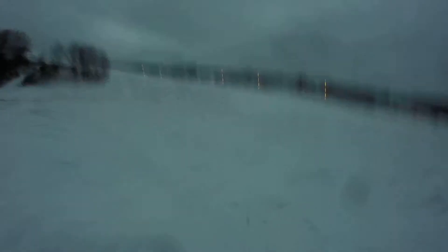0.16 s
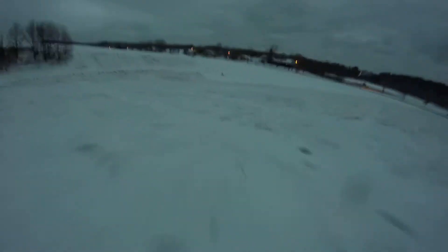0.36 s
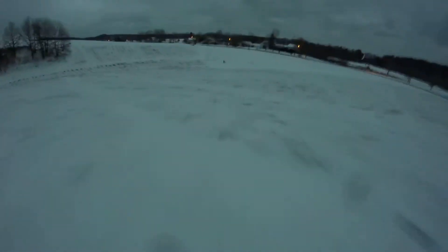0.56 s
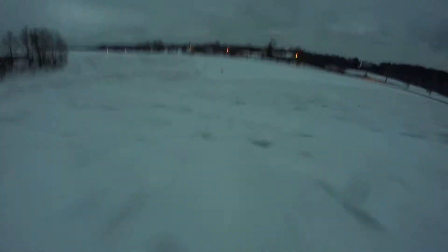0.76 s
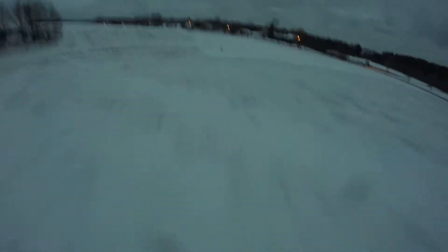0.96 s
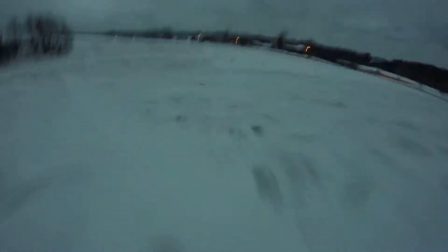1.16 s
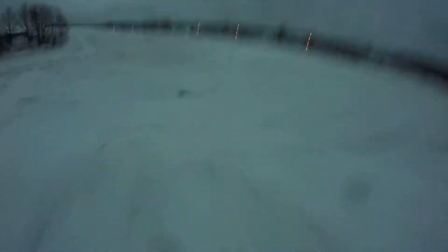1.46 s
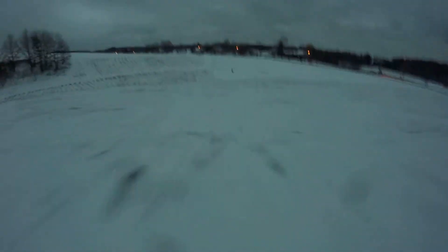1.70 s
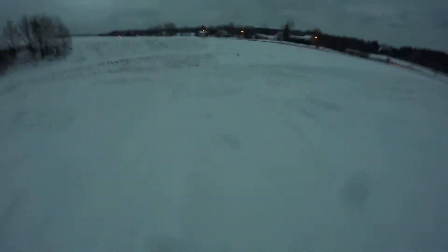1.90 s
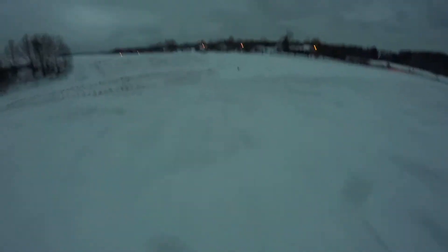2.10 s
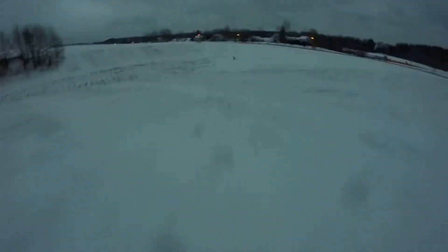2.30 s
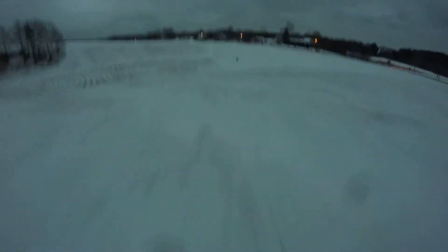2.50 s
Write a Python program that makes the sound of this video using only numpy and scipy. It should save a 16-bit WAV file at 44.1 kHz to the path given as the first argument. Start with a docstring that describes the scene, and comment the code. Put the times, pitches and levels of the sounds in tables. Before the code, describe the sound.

A sled slides fast across a crusty snow field with a continuous, uneven, hollow scrape. Crunches, icy ticks and low thumps break in throughout, while wind rumbles on a small enclosed microphone fixed to the sled.

```python
"""On crusty snow, a fast sled is heard by a small microphone shut in a hard housing fixed to it.
Friction with the grains is a stream of tiny impacts that excites the resonances of hull and housing;
breaking crust and icy lumps excite the same resonances in bursts and ticks. Ridges jolt the springy
mount into damped oscillation and knock the hull, while turbulent air rumbles past the housing."""
import sys
import numpy as np
from scipy import signal
from scipy.fft import rfft, irfft
from scipy.io import wavfile
from scipy.ndimage import uniform_filter1d

SR = 44100
rng = np.random.default_rng(int(sys.argv[2]) if len(sys.argv) > 2 else 0)


def persist_wave(psi):
    """Save psi, clipped to +-1, as 16-bit WAV."""
    counts = np.round(np.clip(psi, -1, 1) * 32767).astype(np.int16)
    wavfile.write(sys.argv[1], SR, np.atleast_2d(counts).T)


N = 116865

# Resonances of hull and housing in three registers, the highest heard as hiss.
# Each row: frequency in Hz, bandwidth of one filter stage in Hz, relative gain in dB.
LOW_MODES = [(1097, 37, -13), (1385, 104, -0.5), (1442, 145, 0), (1522.3, 82, 5), (1666, 156, 1),
             (1805, 122, 2)]
UPPER_MODES = [(2156, 233, -3.5), (2441, 70, -3), (2590, 262, -1), (2850, 270, -5.5), (2960, 270, -10),
               (3475, 640, -15), (3820, 350, -20)]
HISS_MODES = [(4660, 2300, -4), (6126, 1010, 3), (7420, 1050, -2), (8070, 990, -6.5), (9900, 650, -18),
              (11400, 1000, -17.5), (12900, 1200, -21), (13700, 900, -23), (15000, 500, -36)]


def amp(db):
    """Amplitude ratio of a level in decibels."""
    return 10 ** (np.asarray(db) / 20)


def unit_rms(x):
    """Normalisation to an rms of 1."""
    return x / np.sqrt(np.mean(x ** 2) + 1e-20)


def envelopes(rows):
    """Linear interpolation of each column over the times in the first."""
    times, *columns = np.transpose(rows)
    return [np.interp(np.arange(N) / SR, times, column) for column in columns]


def drift(corner_hz):
    """Random modulation: low-passed noise with an rms near 1."""
    step, settle = 20, 2000
    pole = np.exp(-2 * np.pi * corner_hz * step / SR)
    noise = rng.standard_normal(N // step + settle + 2)
    slow = signal.lfilter([1], [1, -2 * pole, pole * pole], noise)[settle:]
    return np.interp(np.arange(N) / step, np.arange(len(slow)), unit_rms(slow))


def coloured(x, spectrum):
    """Spectral shaping by a curve of (Hz, dB) points; rms 1."""
    hz, db = np.transpose(spectrum)
    bin_hz = np.arange(N // 2 + 1) * SR / N + 1
    gain = amp(np.interp(np.log(bin_hz), np.log(hz), db, left=-90, right=-90))
    return unit_rms(irfft(rfft(x) * gain, N))


def impacts(per_s, spread_db):
    """Shot noise: independent impulses of random size and sign; rms 1."""
    sizes = amp(spread_db * np.minimum(rng.exponential(1, N), 5))
    signs = rng.choice([-1, 1], N)
    return unit_rms(sizes * signs * (rng.random(N) < per_s / SR))


def resonate(drives, modes):
    """Modal superposition: two drives feed alternate resonances, each wavering in level; rms 1."""
    total = 0
    for k, (hz, width_hz, db) in enumerate(modes):
        r = np.exp(-np.pi * width_hz / SR)
        stage = [(1 - r * r) / 2, 0, (r * r - 1) / 2, 1, -2 * r * np.cos(2 * np.pi * hz / SR), r * r]
        gain = amp(db + 2 * drift(corner_hz=36.4))
        total = total + gain * signal.sosfilt([stage, stage], drives[k % 2])
    return unit_rms(total)


def scrape():
    """Sliding friction: grain impacts force the hull to ring and drone, louder under greater load."""
    # Load on the snow. Each row: time in seconds, level of the low modes in dB,
    # levels of the upper modes and of the hiss in dB relative to it.
    slide = [(0.0, -39, -6.5, -19), (0.1, -45, -1, -17), (0.13, -29.5, -1.5, -19), (0.15, -37, -2.5, -15.5),
             (0.18, -36, -6.5, -25), (0.22, -38, -2, -15.5), (0.24, -33, -9, -29), (0.29, -29, 0.5, -27),
             (0.29, -23.5, -11, -29), (0.32, -40, -3.5, -24), (0.35, -38, 0, -11), (0.47, -36, -1.5, -21),
             (0.49, -36.5, -5.5, -14.5), (0.52, -38.5, 0.5, -23), (0.54, -31.5, -6.5, -25),
             (0.58, -31, -7, -26), (0.6, -43, 2, -13.5), (0.66, -41, -4.5, -16), (0.69, -41.5, -7, -34),
             (0.71, -31, -8.5, -31), (0.77, -35.5, -3.5, -20), (0.84, -29, -5, -27.5),
             (0.87, -33, 0, -14.5), (0.88, -29.5, -2.5, -23), (0.94, -36.5, -3, -17), (1.0, -37, -4, -15.5),
             (1.03, -42, 0.5, -18), (1.07, -29.5, -3, -21), (1.14, -34, -2.5, -17), (1.2, -30, -6, -22.5),
             (1.26, -32.5, -5, -20.5), (1.31, -38, 2, -13.5), (1.35, -32, -1.5, -28),
             (1.37, -37.5, 0.5, -14), (1.42, -34, -2.5, -18), (1.52, -32.5, -4, -19.5), (1.56, -43, 1, -17),
             (1.62, -35, -3, -20), (1.64, -37.5, 1, -15.5), (1.8, -32.5, -3.5, -19.5), (1.83, -31, -2, -18),
             (1.87, -34, -1.5, -14.5), (1.89, -26.5, -9.5, -23), (1.95, -33.5, -4, -19.5),
             (2.05, -37.5, -7, -23.5), (2.1, -41.5, -2, -19), (2.12, -34.5, 1, -20),
             (2.17, -37.5, -2, -15.5), (2.21, -30.5, -3, -23), (2.235, -34, -4, -20.5),
             (2.28, -28, -8, -23), (2.33, -38.5, -3, -20), (2.365, -30, -7.5, -22.5),
             (2.42, -33, -5.5, -21.5), (2.45, -42.5, 5, -18), (2.48, -30.5, -3.5, -20),
             (2.51, -39.5, -5, -18), (2.53, -33, -10.5, -27), (2.55, -41, 1, -16), (2.57, -31, -7.5, -19.5),
             (2.61, -35, -3.5, -22), (2.65, -30, -2.5, -21)]
    # The hull's dull drone. Each row: frequency in Hz, relative spectral level in dB.
    drone_spectrum = [(76, -48), (130, -3.5), (178, -9.5), (379, -6.5), (445, -13.5), (570, -11),
                      (675, -15.5), (872, -13), (1250, -8), (1620, -19.5), (2750, -120)]
    load_db, upper_db, hiss_db = uniform_filter1d(envelopes(slide), size=int(0.005 * SR))
    chatter = amp(0.59 * drift(corner_hz=44.5))
    grains = [chatter * impacts(per_s=5000, spread_db=2.5) for _ in range(2)]
    low = resonate(grains, LOW_MODES)
    upper = amp(upper_db) * resonate(grains, UPPER_MODES)
    grit = amp(-5.5) * impacts(per_s=150, spread_db=3)
    hiss = amp(hiss_db) * resonate(grains + grit, HISS_MODES)
    drone_db = -43 + 0.78 * (load_db - load_db.mean()) + 1.5 * drift(corner_hz=1.5)
    drone = amp(drone_db) * coloured(grains[0], drone_spectrum)
    return amp(load_db) * (low + upper + hiss) + drone


def wind():
    """Turbulence: fluctuating pressure on the housing gives an uneven rumble over a faint steady hiss."""
    # Gusts. Each row: time in seconds, level in dB.
    gusts = [(0.0, -40), (0.11, -48.5), (0.21, -29), (0.36, -41), (1.04, -45), (1.09, -44), (1.28, -34.5),
             (1.3, -45), (1.47, -31.5), (1.66, -49.5), (1.93, -42.5), (1.96, -39.5), (2.04, -38.5),
             (2.54, -43), (2.65, -46.5)]
    # Spectra of the rumble and the hiss. Each row: frequency in Hz, relative spectral level in dB.
    rumble_spectrum = [(14, 10.5), (25, -1), (45, 3.5), (80, -28), (160, -29), (300, -37.5), (600, -31.5)]
    hiss_spectrum = [(4000, 5), (9000, 3), (12000, -4), (15000, -8), (16000, -14)]
    gust_db, = envelopes(gusts)
    buffeting = amp(gust_db + 3 * drift(corner_hz=9))
    rumble = buffeting * coloured(rng.standard_normal(N), rumble_spectrum)
    return rumble + amp(-71) * coloured(rng.standard_normal(N), hiss_spectrum)


def jolts():
    """Base excitation: ridges push the mount, a damped mass on a spring, and the hull knocks."""
    # Each row: time of the push's peak in seconds, its level in dB, its direction as a sign,
    # its length in seconds, level of the knock in dB.
    ridges = [(0.067, -29, 1, 0.0082, -40.5), (0.244, -14, -1, 0.0063, -33), (0.271, -20, 1, 0.016, -56),
              (0.2818, -4, -1, 0.011, -30.5), (0.2927, -13, 1, 0.0091, -43), (0.306, -18, -1, 0.0079, -41),
              (0.452, -25, -1, 0.0098, -39), (0.666, -25.5, -1, 0.0057, -43),
              (0.733, -25.5, 1, 0.0055, -42), (0.865, -24.5, -1, 0.0088, -39),
              (1.1583, -22, 1, 0.0069, -44), (1.177, -14, -1, 0.024, -33.5), (1.207, -14, -1, 0.0053, -37),
              (1.255, -22.5, 1, 0.013, -51), (1.386, -37, -1, 0.013, -43), (1.4102, -15, -1, 0.005, -35.5),
              (1.449, -18.5, 1, 0.007, -27.5), (1.495, -20.5, -1, 0.02, -65), (1.516, -23, -1, 0.011, -54),
              (1.595, -26, 1, 0.011, -64), (1.796, -16.5, -1, 0.0079, -41), (2.02, -21, -1, 0.015, -44),
              (2.057, -26.5, 1, 0.0061, -42), (2.196, -25, 1, 0.0095, -38.5),
              (2.224, -26.5, 1, 0.0075, -41), (2.305, -21, -1, 0.0067, -39), (2.441, -35.5, 1, 0.01, -44),
              (2.492, -22.5, -1, 0.0068, -50)]
    knock_hz, knock_t60_s = 387, 0.069
    mount_modes = [(66.8, 0.093, 0.5), (49, 0.2, 0.2)]  # frequency in Hz, damping ratio, share
    t, push, knock = np.arange(N) / SR, np.zeros(N), np.zeros(N)
    for peak_s, push_db, direction, length_s, knock_db in ridges:
        pulse = np.cos(np.pi * np.clip((t - peak_s) / length_s, -.5, .5)) ** 2.57
        push += np.sign(direction) * amp(push_db) * pulse
        age = np.maximum(t - peak_s, 0)
        knock += amp(knock_db - 60 * age / knock_t60_s) * np.sin(2 * np.pi * knock_hz * age)
    lowpass = signal.butter(2, 140, fs=SR, output="sos")
    small_bumps = signal.sosfilt(lowpass, impacts(per_s=60, spread_db=0.52))
    push += amp(-46.5) * unit_rms(small_bumps)
    swing = 0
    for hz, damping, share in mount_modes:
        w = 2 * np.pi * hz
        oscillator = signal.bilinear([w * w], [1, 2 * damping * w, w * w], SR)
        swing = swing + share * signal.lfilter(*oscillator, push)
    highpass = signal.butter(1, 18, "high", fs=SR)
    return signal.lfilter(*highpass, push - swing) + knock


def crunches():
    """Brittle fracture: crust gives way in decaying noise bursts, a bright spray and a ringing bite."""
    # Each row: start in seconds, nominal peak level of the spray in dB, level of the bite in dB.
    fractures = [(0.1241, -44, -25.5), (0.218, -49, -26.5), (0.268, -30.5, -22.5), (0.3403, -32, -52),
                 (0.4923, -41, -44), (0.5316, -40, -25.5), (0.549, -31, -28), (0.6684, -39, -40),
                 (0.6832, -30.5, -24.5), (0.781, -30, -37), (0.9273, -46, -42), (1.0495, -34, -28),
                 (1.2024, -30, -19.5), (1.338, -28, -26.5), (1.3975, -29, -18.5), (1.606, -29.5, -24.5),
                 (1.764, -27, -25.5), (2.126, -32.5, -32), (2.199, -33, -26), (2.302, -32, -29),
                 (2.3514, -36, -25.5), (2.4442, -32, -33), (2.5562, -29, -23.5)]
    rise_s, spray_t60_s, bite_t60_s = 0.003, 0.058, 0.082
    t, spray, bite = np.arange(N) / SR, np.zeros(N), np.zeros(N)
    for start_s, spray_db, bite_db in fractures:
        age = np.maximum(t - start_s, 0)
        rise = 1 - np.exp(-age / rise_s)
        spray += rise * amp(spray_db - 60 * age / spray_t60_s)
        bite += rise * amp(bite_db - 60 * age / bite_t60_s)
    noise = rng.standard_normal((2, N))
    highpass = signal.butter(1, 5000, "high", fs=SR, output="sos")
    bright = unit_rms(signal.sosfilt(highpass, resonate(noise, HISS_MODES)))
    ringing = resonate(noise, LOW_MODES + UPPER_MODES)
    return spray * bright / 4 + bite * ringing  # noise peaks at about 4 times its rms


def ticks():
    """Impulse response: each icy lump strikes the hull once and leaves its modes ringing freely."""
    # Each row: start in seconds, nominal peak levels of the ring and of the hiss in dB.
    lumps = [(0.1258, -23, -49), (0.5343, -24, -44), (0.5496, -34, -31.5), (0.6684, -40, -40),
             (0.7824, -37, -33), (0.837, -24, -47), (0.9273, -37, -37.5), (0.9977, -25, -45),
             (1.052, -22, -44), (1.2, -24, -35), (1.6067, -33, -40), (1.771, -20.5, -43),
             (1.8364, -19.5, -49), (2.1292, -28, -31.5), (2.2703, -24, -36), (2.4444, -32, -42),
             (2.5571, -26, -42)]
    start_s, ring_db, hiss_db = np.transpose(lumps)
    total = 0
    for db, modes in [(ring_db, LOW_MODES + UPPER_MODES), (hiss_db, HISS_MODES)]:
        hits = np.full(N, 1e-18)
        hits[(start_s * SR).astype(int)] = amp(db)
        ringing = resonate([hits, -hits], modes)
        total = total + ringing * hits.max() / np.abs(ringing).max()
    return total


def scene():
    """Superposition: all sources add at the one microphone."""
    return (scrape() + wind() + jolts() + crunches() + ticks())[None]


def record(dry):
    """Band limiting: a steep low-pass filter removes the treble above 15.3 kHz."""
    return signal.sosfilt(signal.ellip(12, .5, 85, 15300, fs=SR, output="sos"), dry)


dry = scene()
out = record(dry)
persist_wave(out)
```